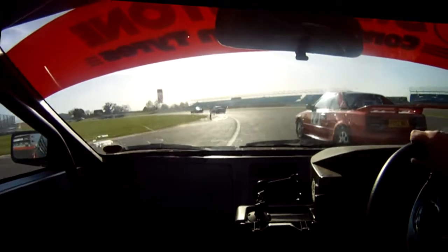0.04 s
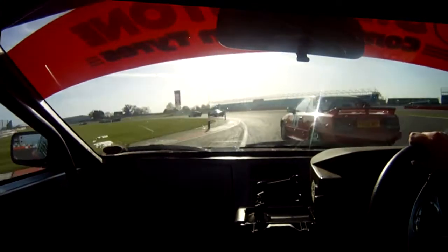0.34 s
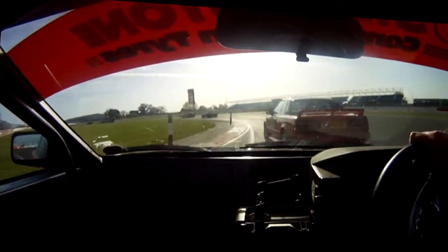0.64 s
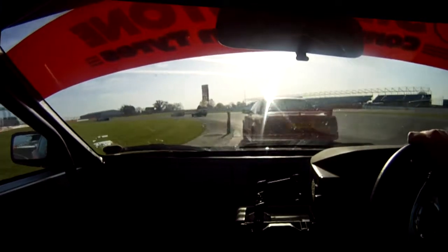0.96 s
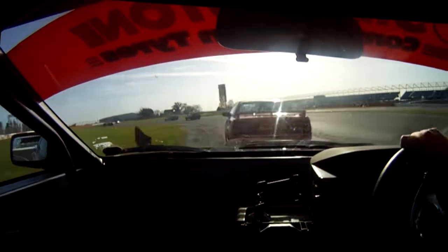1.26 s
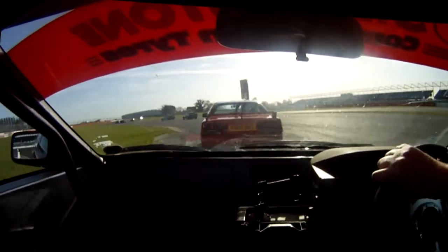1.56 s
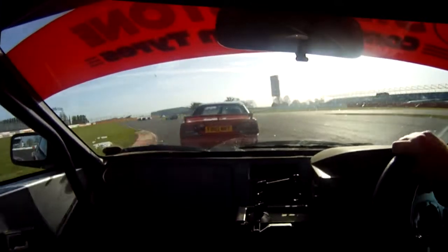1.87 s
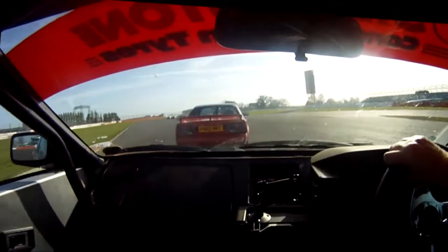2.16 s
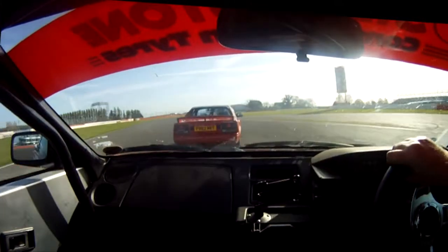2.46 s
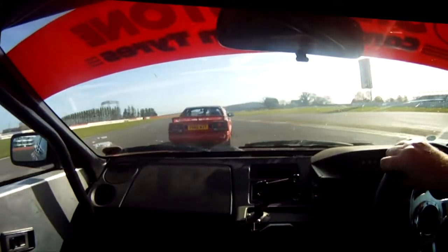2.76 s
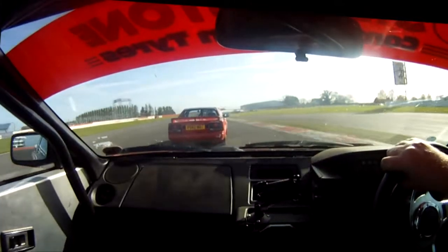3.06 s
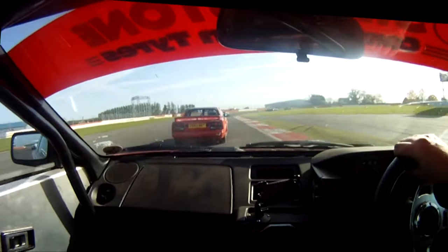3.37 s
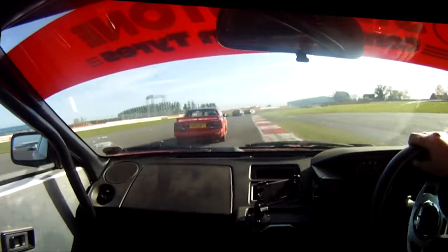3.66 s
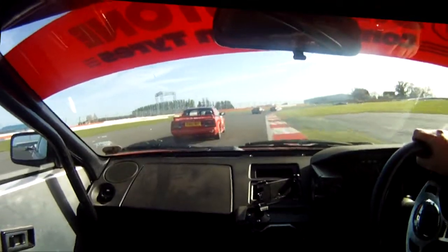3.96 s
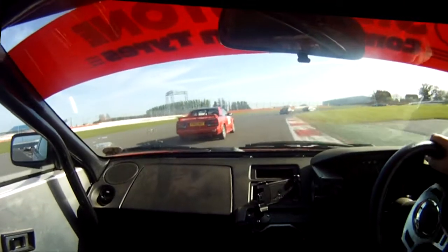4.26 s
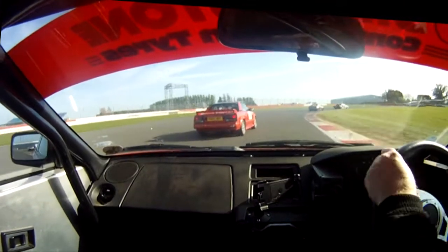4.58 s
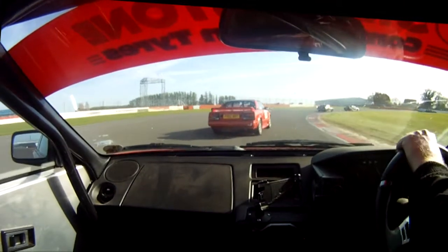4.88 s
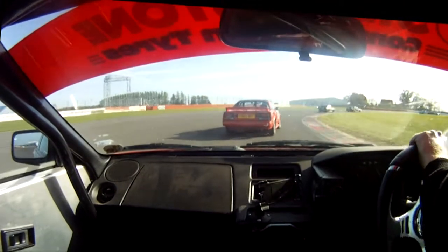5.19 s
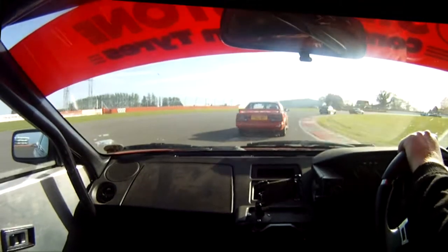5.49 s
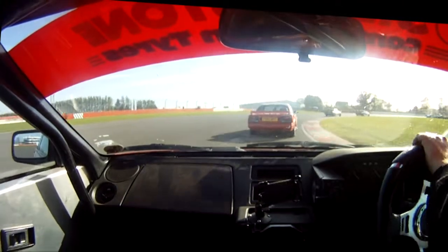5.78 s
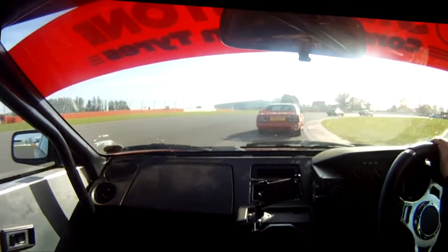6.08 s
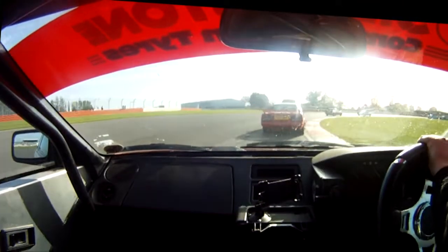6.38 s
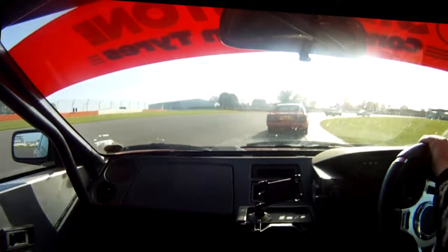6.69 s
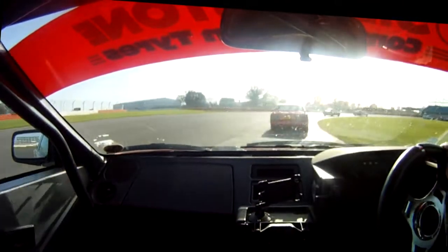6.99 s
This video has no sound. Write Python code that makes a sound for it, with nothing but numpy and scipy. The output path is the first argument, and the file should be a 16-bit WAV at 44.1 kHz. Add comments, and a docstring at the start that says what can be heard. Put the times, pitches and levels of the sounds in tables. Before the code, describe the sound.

Inside a bare race car cabin, a four-cylinder engine jumps up in revs and booms, snarling under throttle over tyre rumble and rushing air. The revs creep higher while the car ahead howls, then sag, and the other car's drone beats against the engine note. Loose trim rattles faintly and the tyres thud over bumps. The onboard microphone adds a thin treble sizzle.

```python
"""Inside a four-cylinder race car chasing another through a bend. The revs jump up and the firing note
booms in the bare cabin, over tyre rumble, rushing air and rattling trim. As the revs climb under throttle,
the car ahead howls; then they sag, and its drone beats against the firing note. All along, the onboard
camera rides its gain and samples slowly, which mirrors the sound into a thin treble sizzle."""
import sys
import numpy as np
from scipy import signal
from scipy.fft import rfft, irfft, next_fast_len
from scipy.io import wavfile
from scipy.ndimage import uniform_filter1d, minimum_filter1d, map_coordinates

SR = 44100
rng = np.random.default_rng(int(sys.argv[2]) if len(sys.argv) > 2 else 0)


def to_wav(s):
    """Save 16-bit WAV."""
    ch = np.atleast_2d(s).T  # columns
    pcm = np.round(np.clip(ch, -1, 1) * 32767)  # PCM
    wavfile.write(sys.argv[1], SR, pcm.astype(np.int16))


N = 314874

# fader of the thin whine: (time [s], level [dB])
WHINE_FADER = [(0, -56.5), (2.2, -55.5), (2.9, -48), (3.05, -48), (3.2, -44), (3.7, -54), (4.1, -46),
               (4.35, -60), (7.14, -57)]
# jolts of the loose trim: (time [s], relative level [dB], brightness [dB per octave])
JOLTS = [(0.4886, -36.5, -7.5), (2.952, -20.5, -27.5), (3.0083, -25.5, -14), (3.3277, -33, -14),
         (4, -30.5, -8.5), (4.033, -39, -19), (4.2186, -34, -19), (4.6772, -32, -7), (4.7334, -32.5, -34),
         (5.0509, -36.5, -4), (5.3626, -35, -21), (5.8553, -37, -7.5), (5.892, -27, -26.5),
         (6.1742, -38, -14), (6.2893, -40, -27), (6.7857, -36.5, -28)]
# ringing modes of the trim: (frequency [Hz], relative level [dB], decay t60 [s])
TRIM_MODES = [(2455, -3.5, 0.0097), (2890, 2.5, 0.016), (3198, 2, 0.017), (3830, -2, 0.0079),
              (4435, -3.5, 0.0051), (5140, 0.5, 0.0037)]
# mix of the road bed: (time [s], tyre rumble [dB], cabin roar before its boost [dB], air rush [dB])
ROAD_FADERS = [(0, -21.5, -36.5, -41), (1, -25.5, -38, -42), (1.35, -23.5, -38, -42),
               (2.1, -25.5, -38.5, -44.5), (2.9, -25, -36.5, -40.5), (3.45, -24, -36, -40),
               (3.65, -23.5, -34.5, -39), (4.3, -22.5, -38, -41.5), (4.75, -25, -37.5, -38),
               (5.4, -21.5, -37, -43.5), (6.1, -24, -39, -45.5), (6.5, -22.5, -37.5, -43),
               (7.14, -25.5, -40.5, -44)]
# tone colours of rumble, roar and rush: (frequency [Hz], relative level [dB])
RUMBLE_EQ = [(12, -27), (25, 1), (48, 3.5), (72, -6), (95, 3), (130, -1.5), (170, 6), (230, -38.5),
             (500, -68.5)]
ROAR_EQ = [(90, -29), (170, 5), (220, -4), (290, 2), (360, 2.5), (430, -7.5), (520, -4), (620, -10),
           (720, -17), (930, -13), (1040, -16), (1160, -19.5), (1400, -32), (2200, -39)]
RUSH_EQ = [(710, -40.5), (1200, 2), (1260, -11), (1560, -6), (1880, -9.5), (2080, -2.5), (2240, -4.5),
           (2440, -1.5), (3180, -6), (3480, -10), (4300, -15), (4990, -13.5), (5600, -17), (7280, -44),
           (12300, -120)]
# the tyres cross bumps and kerbs: (start [s], end [s], rumble lift [dB])
KERBS = [(-.05, 0.037, 9.5), (0.982, 1.066, 13), (1.465, 1.67, 6.5), (2.92, 2.981, 4.5),
         (3.828, 4.492, 5.5), (6.397, 6.612, 4)]
# drone of the car ahead: (time [s], pitch [Hz], hum level [dB])
DRONE_PATH = [(0, 145.4, -47), (.5, 151, -47), (2.25, 152, -54), (2.65, 155.7, -33), (3.05, 154.4, -32),
              (3.35, 156, -31.5), (3.7, 158.4, -26.5), (4.05, 160.2, -33), (4.8, 167.1, -22),
              (5.1, 166.5, -28), (5.3, 165.1, -15.5), (5.6, 157.9, -20.5), (6.3, 154.9, -19.5),
              (6.6, 156.2, -15), (7.14, 155.4, -17.5)]
# weak overtones of its hum: (harmonic [number], relative level [dB])
DRONE_HARMONICS = [(2, -25), (4, -29), (6, -27.5)]
# its third harmonic swells to a howl: (start [s], end [s], level [dB])
DRONE_HOWLS = [(0.432, .68, -28.5), (2.5, 3.8, -23.5), (6.55, 7.3, -37)]
# revs of the chasing car: (time [s], firing rate [Hz])
FIRING_RATE = [(0, 87.8), (.05, 100.8), (.15, 152.8), (.2, 162.5), (.6, 163.6), (.9, 163.3), (1.5, 165.8),
               (2.05, 161.8), (2.6, 169.7), (3.1, 169.8), (3.5, 173.7), (4.35, 176.6), (4.5, 169.3),
               (4.65, 168.5), (4.95, 163.4), (5.15, 156.5), (5.5, 150.5), (6.3, 150.9), (6.65, 144),
               (7.14, 140.6)]
# its engine load: (time [s], load [dB])
LOAD = [(0, -5), (.2, 1), (.5, 5.5), (.72, 2), (.9, -3.5), (1.3, -10.5), (1.52, 1), (1.7, -2.5),
        (2.05, 0.5), (2.3, 2), (3.3, 5.5), (3.5, 0), (4.3, 1.5), (4.75, -1), (5, -3.5), (5.5, -9),
        (6.1, 1.5), (6.6, -9.5), (7.14, -9)]
# faders of the firing note, the throb at 1.5 times its pitch and its octave: (time [s], level [dB])
BOOM_FADER = [(0, -18), (.75, -15.5), (1.3, -14.5), (1.6, -16.5), (1.75, -9), (2.1, -13.5), (2.85, -14),
              (3.08, -9), (3.22, -18.5), (3.4, -8.5), (3.6, -17), (4.3, -22), (4.55, -14), (5, -12.5),
              (5.4, -17.5), (6.05, -13.5), (6.6, -19.5), (7.14, -15.5)]
THROB_FADER = [(0, -46), (.2, -36), (.42, -23), (.7, -25.5), (.9, -44), (1.55, -35), (1.85, -45),
               (2.25, -31.5), (3.45, -36.5), (3.85, -27), (4.1, -39), (4.75, -25.5), (5.15, -32.5),
               (5.5, -48), (7.14, -55)]
OCTAVE_FADER = [(0, -35.5), (.15, -20.5), (.5, -23), (.9, -21.5), (1.6, -26.5), (1.8, -33.5), (2.25, -24),
                (3.1, -29), (4.1, -35.5), (4.75, -26), (5, -32.5), (5.7, -35), (5.95, -20.5), (6.4, -28.5),
                (6.8, -33), (7.14, -32)]
# the firing note drops out briefly: (time [s], length [s], depth [dB])
BOOM_DIPS = [(0.906, 0.1, 7.5), (1.546, .13, 27), (1.824, 0.047, 13), (1.99, 0.055, 14), (2.933, 0.12, 4.5),
             (3.565, .04, 7), (4.091, 0.07, 23), (6.406, 0.17, 14)]
# weaker engine partials: (order [multiple of the four-stroke cycle rate], base level [dB])
SNARL_ORDERS = [(5, -42), (7, -52), (9, -40.5), (10, -44.5), (13, -42), (15, -52), (16, -50), (17, -60),
                (18, -53.5), (19, -61), (20, -56), (21, -55.5), (23, -59.5), (24, -57.5), (28, -54),
                (32, -58.5)]
# body panel resonances: (centre [Hz], width [Hz], lift [dB])
PANEL_MODES = [(603, 8.3, 16), (638, 21, 9.5), (707, 18, 8), (876.1, 5.9, 11), (912, 16, 13.5),
               (1022.6, 30, 9.5)]


def amp(db):
    """Decibels to gain."""
    return 10 ** (np.asarray(db) / 20)


def unit(x):
    """Scaled to rms 1."""
    return x / np.sqrt(np.mean(x ** 2) + 1e-20)


def curves(rows):
    """Automation lanes: one value per sample for each column after the time."""
    times, *columns = np.transpose(rows)
    return [np.interp(np.arange(N) / SR, times, column) for column in columns]


def wobble(rate):
    """A smooth random curve, rate knots a second."""
    return map_coordinates(rng.standard_normal(4096), [np.arange(N) * rate / SR], mode="wrap")


def swell(start, end, edge_s):
    """A fade up towards 1 at start and back down at end."""
    t = np.arange(N) / SR
    return (np.tanh((t - start) / edge_s / 2) - np.tanh((t - end) / edge_s / 2)) / 2


def filtered(x, response):
    """x through an EQ whose gain is a function of frequency."""
    size = next_fast_len(N + SR // 2)
    return irfft(rfft(x, size) * response(np.fft.rfftfreq(size, 1 / SR)), size)[:N]


def noise(eq):
    """Noise of rms 1, coloured by the EQ points."""
    points_hz, db = np.transpose(eq)
    gain = lambda hz: amp(np.interp(np.log(hz + 1), np.log(points_hz), db, right=-120))
    return unit(filtered(rng.standard_normal(N), gain))


def resonance_db(hz, centre_hz, width_hz, lift_db):
    """The lift a tone gets as it sweeps through a resonance."""
    return lift_db / (1 + (2 * (hz - centre_hz) / width_hz) ** 2)


def partial(cycles, order, rough, flutter_rate):
    """One tone of rms 1 locked to a shaft; uneven combustion shakes its level and phase."""
    angle = 2 * np.pi * (order * cycles + rng.random())
    tone = (1 + rough * wobble(flutter_rate)) * np.sin(angle)
    return unit(tone + rough * wobble(flutter_rate) * np.cos(angle))


def whine(pitch_hz=2062, waver_hz=11):
    """A faint, fuzzy whine that wavers around one pitch and comes up mid-bend."""
    level_db, = curves(WHINE_FADER)
    cycles = np.cumsum(pitch_hz + waver_hz * wobble(12)) / SR
    return amp(level_db) * partial(cycles, order=1, rough=0.49, flutter_rate=22)


def trim_rattles(chatter_t60=0.084, attack_s=0.0014, lead_s=0.004, gain_db=-15):
    """Each jolt makes the trim chatter: fading contacts ring its modes, the higher ones if it is bright."""
    out, t = np.zeros(N + SR), np.arange(SR // 8) / SR
    mean_brightness = np.mean([row[2] for row in JOLTS])
    envelope = amp(-60 * t / chatter_t60) * (1 - np.exp(-t / attack_s))
    for time, level_db, brightness in JOLTS:
        tilt = brightness - mean_brightness
        contacts = envelope * rng.standard_normal(len(t)) * amp(1.6 * wobble(430)[:len(t)])
        ring = sum(amp(db + tilt * np.log2(hz / 3000) - 60 * t / t60) * np.cos(2 * np.pi * hz * t)
                   for hz, db, t60 in TRIM_MODES)
        burst = signal.fftconvolve(contacts, ring)[:len(t)]
        out[round((time - lead_s) * SR):][:len(t)] += amp(level_db + gain_db) * unit(burst)
    return out[:N]


def road(cycles, roar_boost_db=11.5, tarmac_db=0.08):
    """Tyre rumble, cabin roar and rushing air, lifted by bumps; the firings chop the roar and the rush."""
    rumble_db, roar_db, rush_db = curves(ROAD_FADERS)
    load_db, = curves(LOAD)
    bump_db = sum(db * swell(start, end, edge_s=0.015) for start, end, db in KERBS)
    firing = np.cos(8 * np.pi * cycles)
    crank = np.cos(4 * np.pi * cycles)
    # under load one cylinder hits harder, so the roar lopes once a cycle
    lope = 0.25 * amp(load_db) * np.cos(2 * np.pi * cycles)
    rumble = amp(rumble_db + bump_db) * noise(RUMBLE_EQ)
    roar_gain = amp(roar_db + roar_boost_db + 0.42 * bump_db)
    roar = roar_gain * unit(noise(ROAR_EQ) * (1 + lope + 0.075 * crank + 0.11 * firing))
    rush_gain = amp(rush_db + 0.28 * bump_db + 1.2 * wobble(25))
    rush = rush_gain * unit(noise(RUSH_EQ) * (1 + 0.037 * crank + 0.069 * firing))
    return amp(tarmac_db * wobble(16)) * (rumble + roar + rush)  # uneven tarmac shakes the whole bed


def car_ahead():
    """Its third harmonic howls as it pulls away; later its hum nears the firing note and the two beat."""
    pitch_hz, hum_db = curves(DRONE_PATH)
    cycles = np.cumsum(pitch_hz) / SR
    hum = partial(cycles, order=1, rough=0.05, flutter_rate=14)
    hum += sum(amp(db) * partial(cycles, order, rough=0.53, flutter_rate=14)
               for order, db in DRONE_HARMONICS)
    howl_gain = sum(amp(db) * swell(start, end, edge_s=0.055) for start, end, db in DRONE_HOWLS)
    howl = howl_gain * partial(cycles, order=3, rough=0.13, flutter_rate=16)
    return amp(hum_db) * hum + howl


def engine_boom(cycles):
    """Four firings a cycle boom in the bare cabin, with a throb a fifth above and the octave on top."""
    boom_db, throb_db, octave_db = curves(BOOM_FADER) + curves(THROB_FADER) + curves(OCTAVE_FADER)
    t = np.arange(N) / SR
    dip_db = sum(depth * np.exp(-(2 * (t - time) / length) ** 2) for time, length, depth in BOOM_DIPS)
    boom_gain = amp(boom_db - dip_db + 1.9 * wobble(20))
    boom = boom_gain * partial(cycles, order=4, rough=0.087, flutter_rate=35)
    throb = amp(throb_db) * partial(cycles, order=6, rough=0.18, flutter_rate=14)
    octave = amp(octave_db + 1.5 * wobble(7)) * partial(cycles, order=8, rough=0.18, flutter_rate=25)
    return boom + throb + octave


def engine_snarl(cycles, cycle_hz):
    """Under throttle the unequal cylinders bark and snarl, swelling through cabin and panel resonances."""
    load_db, = curves(LOAD)
    cabin_db = resonance_db(12 * cycle_hz, centre_hz=502, width_hz=28, lift_db=9.5)
    bark_db = -40 + 1.45 * load_db + cabin_db  # the bark grows faster than the load
    sound = amp(bark_db) * partial(cycles, order=12, rough=0.17, flutter_rate=21)
    for order, db in SNARL_ORDERS:
        panel_db = sum(resonance_db(order * cycle_hz, *mode) for mode in PANEL_MODES)
        sound += amp(db + load_db + panel_db) * partial(cycles, order, rough=0.3, flutter_rate=14)
    return sound


def scene():
    """The mono cabin mix; one four-stroke cycle drives the engine and the pulse of the road bed."""
    cycle_hz = curves(FIRING_RATE)[0] / 4
    cycles = np.cumsum(cycle_hz) / SR
    engine = engine_boom(cycles) + engine_snarl(cycles, cycle_hz)
    return (engine + car_ahead() + road(cycles) + whine() + trim_rattles())[None]


def record(dry, ceiling_db=-12, high_cut_hz=5500, sampling_hz=12000, top_hz=15400):
    """The camera ducks the mix under the boom; its slow, held samples mirror it into a treble sizzle."""
    mix = dry[0]
    level = np.sqrt(np.abs(uniform_filter1d(mix ** 2, size=880)) + 1e-12)
    held_gain = minimum_filter1d(np.minimum(1, amp(ceiling_db) / level), size=1500)
    ducked = mix * uniform_filter1d(held_gain, size=1100)
    dulled = filtered(ducked, lambda hz: 1 / (1 + (hz / high_cut_hz) ** 40))
    mirrored = dulled * (1 + 2 * np.cos(2 * np.pi * sampling_hz * np.arange(N) / SR))
    return filtered(mirrored, lambda hz: np.sinc(hz / sampling_hz) * (hz < top_hz))[None]


dry = scene()
out = record(dry)
to_wav(out)
```